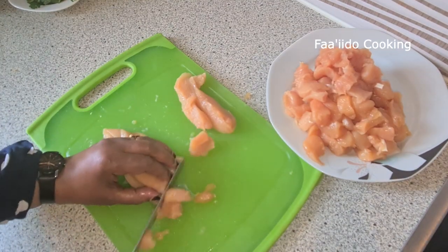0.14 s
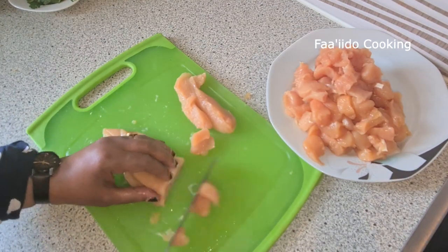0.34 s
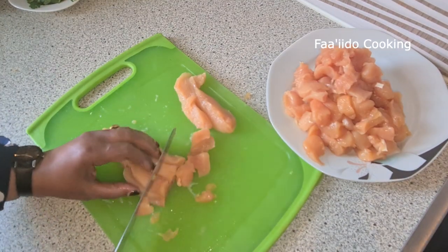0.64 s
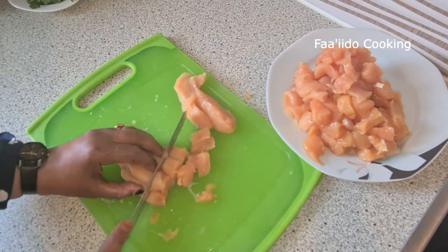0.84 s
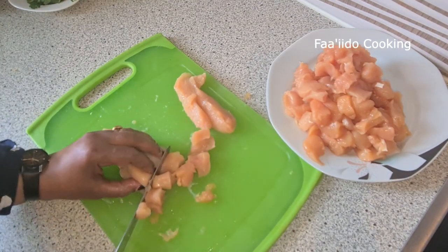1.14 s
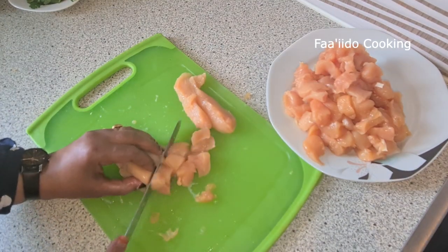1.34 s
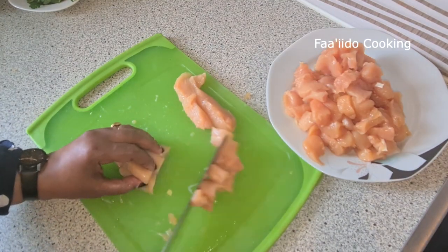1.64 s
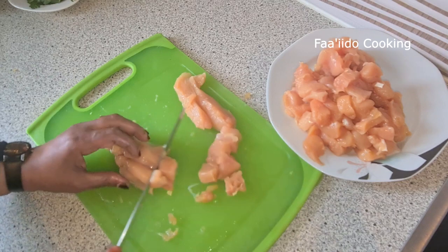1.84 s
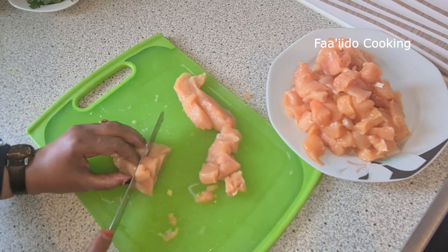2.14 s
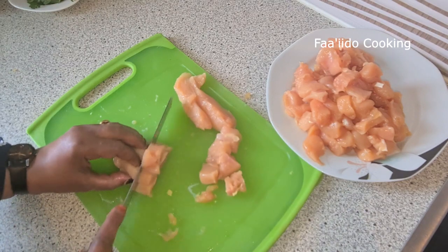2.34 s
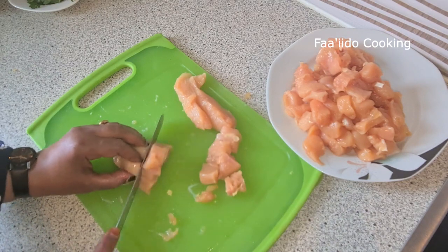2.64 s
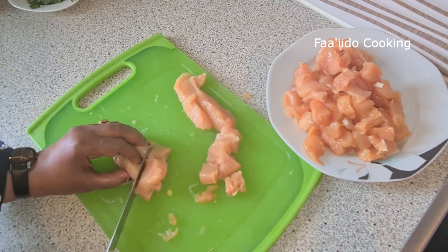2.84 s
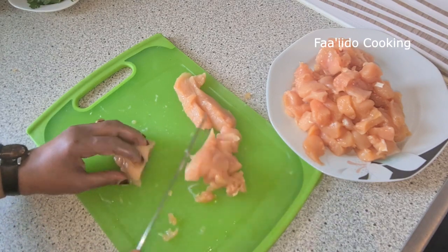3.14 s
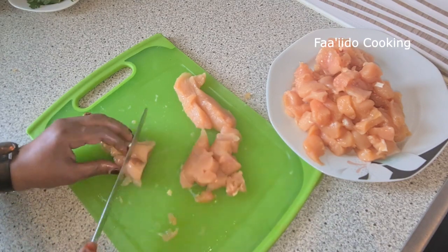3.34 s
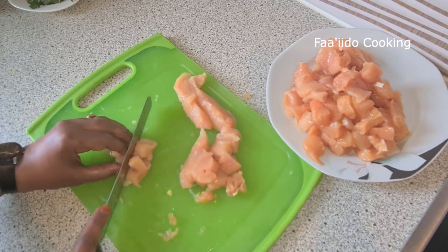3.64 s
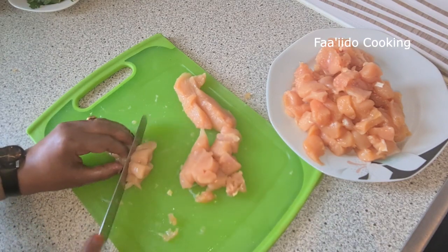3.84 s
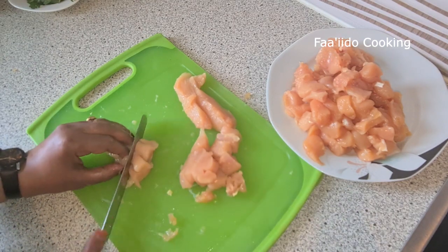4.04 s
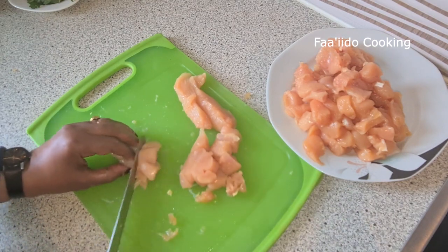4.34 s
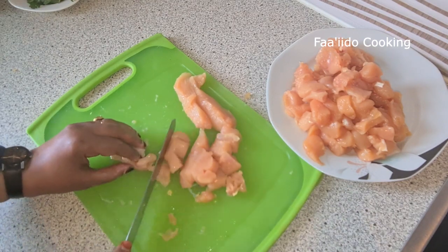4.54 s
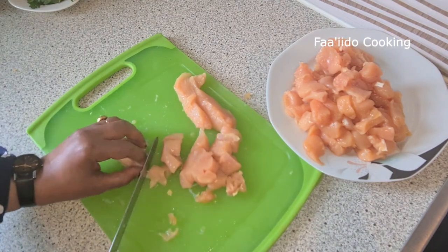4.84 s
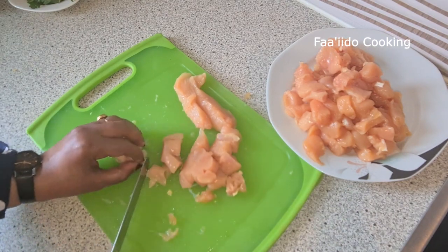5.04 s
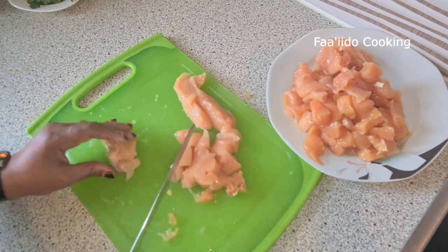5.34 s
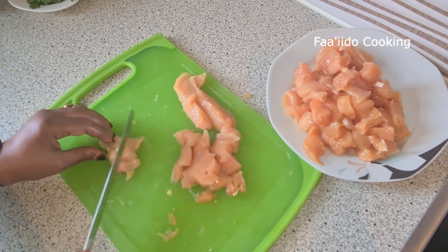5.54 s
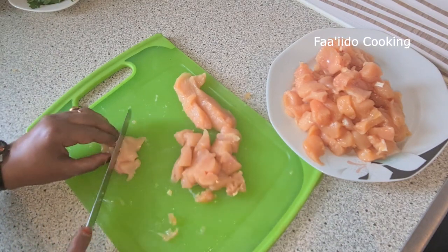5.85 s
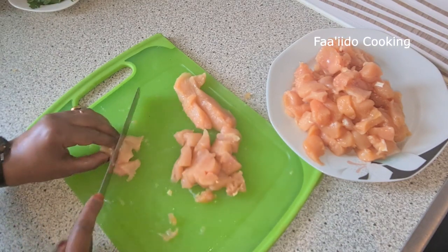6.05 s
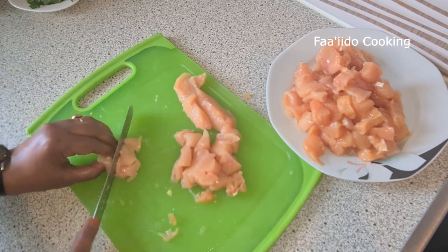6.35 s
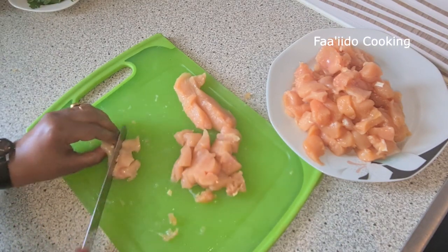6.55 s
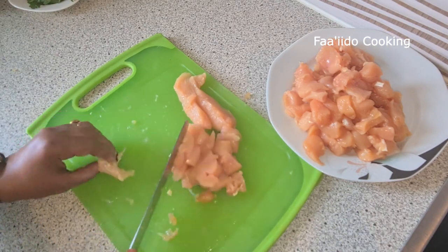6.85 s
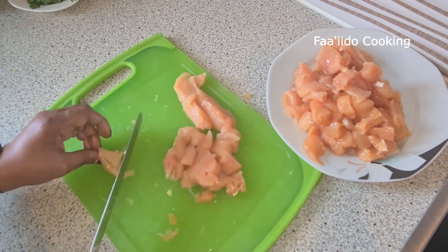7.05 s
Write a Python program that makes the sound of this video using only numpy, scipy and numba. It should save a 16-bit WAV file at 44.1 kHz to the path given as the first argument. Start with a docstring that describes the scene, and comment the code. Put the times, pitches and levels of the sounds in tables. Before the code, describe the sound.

Quiet sticky handling of raw meat alternates with brisk sawing on a resonant plastic board. Each dry, grainy stroke lasts about a tenth of a second, some ending in a short squeak. Quick sideways scrapes swell and glide upward, with soft thumps. Late in the middle the blade knocks the board very loudly once; sweeping and sawing follow. Heard up close in a small room with short reverberation, faint refrigerator hum and low rumble.

```python
"""A small kitchen, a stereo microphone close to a plastic board: a knife cuts raw chicken.
From the start a low room rumble, a faint refrigerator hum and the sticky crackle of the meat lie underneath.
The edge saws to and fro, random slips ringing the board, and squeaks; then it sweeps each piece aside,
a chatter swelling through a hollow ring that glides up, among soft sinking thumps.
Short bursts of noise make the wet ticks and smacks of the meat; now and then the blade knocks on the board."""
import sys
import numpy as np
from scipy import signal
from scipy.fft import rfft, irfft
from scipy.io import wavfile
from scipy.ndimage import uniform_filter1d
from numba import njit

SR = 44100
rng = np.random.default_rng(int(sys.argv[2]) if len(sys.argv) > 2 else 0)


def to_wav(sig):
    """Store sig (one row per channel, or 1-D mono) as 16-bit WAV at the path in sys.argv[1].

    Samples outside -1..1 are clipped; the rate is SR.
    """
    pcm = np.clip(np.atleast_2d(sig), -1, 1) * 32767
    pcm = np.round(pcm).astype(np.int16)
    wavfile.write(sys.argv[1], SR, pcm.T)  # frames by channels


N = 316638  # samples, about 7.2 s
FREQS = np.maximum(np.arange(4097) * SR / 8192, 1)  # frequency axis of all responses [Hz]


def undb(db):
    """Decibels to gain."""
    return 10 ** (np.asarray(db) / 20)


def unit(x):
    """Scale to rms 1."""
    return x / np.sqrt(np.mean(x ** 2))


def colour(points, hz=FREQS):
    """Read (frequency [Hz], value) points on a log-frequency axis."""
    f, v = np.transpose(points)
    return np.interp(np.log(np.maximum(hz, 1)), np.log(f), v)


def bell(hz, width):
    """Power response of one resonance, 1 at its centre."""
    return 1 / (1 + ((FREQS / hz - hz / FREQS) * hz / width) ** 2)


def resonances_power(modes):
    """Power that resonances (centre [Hz], width [Hz], gain [dB]) add to a flat response."""
    return sum((undb(db) ** 2 - 1) * bell(hz, width) for hz, width, db in modes)


def ring(db):
    """Minimum-phase impulse response with the given gain at FREQS: its energy comes early."""
    cepstrum = irfft(np.log(undb(db)))
    half = len(cepstrum) // 2
    # fold the cepstrum on to positive times, which makes the response causal
    cepstrum[1:half] *= 2
    cepstrum[half + 1:] = 0
    return irfft(np.exp(rfft(cepstrum)))[:half]


def add(out, s, x):
    """Mix x into out at time s."""
    i = int(s * SR)
    x, i = x[max(-i, 0):], max(i, 0)
    out[i:i + len(x)] += x[:N - i]


def slips(n, rate, spread_db):
    """Random clicks of unequal size, rms 1; rate is their mean number per second."""
    hit = rng.random(n) < rate / SR
    size_db = spread_db * np.minimum(rng.exponential(size=n), 4)
    return unit(hit * rng.standard_normal(n) * undb(size_db) + 1e-9)


def walk(n, rate):
    """Smooth random curve with rate knots per second, spread near 1."""
    at = np.arange(n) * rate / SR
    knots = int(at[-1]) + 2
    return 1.2 * np.interp(at, np.arange(knots), rng.standard_normal(knots))


def stereo_noise(n, alike_hz):
    """Noise spectra at two close microphones: alike in the bass, unrelated in the treble."""
    hz = np.arange(n // 2 + 1) * SR / n
    mid, side = rfft(rng.standard_normal((2, n)))
    alike = .99 / (1 + (hz / alike_hz) ** 2)
    left_right = np.array([[1], [-1]])
    return hz, (mid * np.sqrt(1 + alike) + left_right * side * np.sqrt(1 - alike)) / np.sqrt(2)


# the plastic board's resonances: (centre [Hz], width [Hz], gain over the smooth response [dB])
BOARD_MODES = [(351, 31, 12.5), (366.5, 28, 15), (620, 16, 1), (694.5, 20, 10), (935, 31, 5),
               (1120, 11, 4.5), (1190, 8.9, 7), (1260, 57, -8), (1356, 65, 7.5), (1460, 85, 3.5),
               (1780, 40, 9), (2037, 38, 8.5), (2475, 40, 4.5), (3050, 160, 1), (3830, 110, 2.5)]


def board_db():
    """The board's resonances as a gain curve."""
    return 10 * np.log10(1 + resonances_power(BOARD_MODES).clip(-.5))


# Source levels below are dry, at the board; only hum and room tone bypass the kitchen's response.
# refrigerator hum: (frequency [Hz], level [dB rms])
FRIDGE_HUM = [(49.4, -77.5), (98.8, -76), (247, -88), (346, -80), (1233, -88.5), (1480, -83)]
# colour of the rumble and hiss of the room: (frequency [Hz], density [dB])
ROOM_COLOUR = [(20, -15.5), (35, -5.5), (60, -0.5), (160, -13), (350, -26.5), (600, -18.5), (1400, -27),
               (4600, -27), (8000, -44.5), (13000, -37.5), (16000, -65)]
ROOM_TONE_DB = -65.5  # rms


def room_tone():
    """Steady low rumble and faint hiss of coloured noise; the refrigerator's sines waver in phase."""
    hz, spectra = stereo_noise(N, alike_hz=700)
    t = np.arange(N) / SR
    hum = 0
    for f, db in FRIDGE_HUM:
        hum = hum + undb(db) * np.sqrt(2) * np.sin(2 * np.pi * f * t + .5 * walk(N, 4.2))
    rumble = unit(irfft(spectra * undb(colour(ROOM_COLOUR, hz)), N))
    return hum + undb(ROOM_TONE_DB) * rumble


def fibres(speed, rate=260, low_hz=900, high_hz=6000, cycles=5, spread_db=3.3):
    """Fibres part under the edge: short pings, each at its own pitch, stronger where the edge is fast."""
    out, t = np.zeros(len(speed)), np.arange(SR // 60) / SR
    chance = rng.random((80, 3))
    for when, pitch, size in chance[:int(rate * len(speed) / SR) + 1]:
        hz, i = low_hz * (high_hz / low_hz) ** pitch, int(when * len(speed))
        ping = np.sin(2 * np.pi * hz * t) * np.exp(-np.pi * hz * t / cycles)
        ping = ping * undb(-spread_db * np.log(size + .02))
        out[i:i + len(t)] += speed[i] * ping[:len(out) - i]
    return unit(signal.lfilter(*signal.butter(2, 800, "high", fs=SR), out) + 1e-12)


def patch_db(spread_db, count=28):
    """Chance colouring of one spot on the board; the bass and the top stay as they are."""
    gains_db = np.pad(spread_db * rng.standard_normal(count - 2), 1)
    return colour(np.c_[np.geomspace(450, 8000, count), gains_db])


LEAD_S = .035  # a faint rasp fades in for this long before a stroke
# uneven sawing: flutter of the grip, colour shifts along the stroke, fibre pings before the rasp's share
GRIP_DB, PATCH_DB, FIBRE_DB = 2.2, 3.2, -9.5


def stroke(length, crest, body_db, rasp_db, hiss_db, response_db, rate, grip_db, swell, lead_db=-22, count=6):
    """A faint rasp fades in, then the edge sticks and slips over the board; treble gathers with its speed."""
    t = np.arange(-int(LEAD_S * SR), int(length * SR)) / SR
    n = len(t)
    travel = np.interp(t / length, [0, np.clip(crest, .05, .95), 1], [0, .5, 1])
    faint = undb(lead_db) * np.interp(t, [-LEAD_S, 0, length], [0, 1, 0])
    speed = np.sin(np.pi * travel).clip(1e-6)
    force = slips(n, rate, spread_db=0.5)
    force = force * undb(grip_db * walk(n, 168.7)) * np.hypot(speed ** swell, faint)
    dull = signal.lfilter(*signal.butter(2, 1900, fs=SR), force)
    force = dull + np.sqrt(speed) * (force - dull)
    tone = [(750, body_db), (1000, 0.0045), (1550, 0.0), (2100, rasp_db), (5000, rasp_db), (8000, hiss_db)]
    db = response_db + colour(tone)
    # the contact point travels, so each part of the stroke favours other frequencies
    sound = 0
    for place in range(count):
        near = np.maximum(1 - np.abs((count - 1) * travel - place), 0)
        sound = sound + signal.fftconvolve(force * near, ring(db + patch_db(PATCH_DB)))
    sound = sound / np.sqrt(np.sum(sound ** 2) / (length * SR))
    sound[:n] += undb(FIBRE_DB + rasp_db / 2) * fibres(speed)
    return sound


# sawing strokes: (start [s], length [s], crest [share of the length], level [dB], board body [dB],
# rasp [dB], wet hiss [dB], favoured board resonance [Hz])
SAW_STROKES = [(0.0, 0.025, 0.057, -39.5, -1, 5.5, 6, 1260.0), (0.087, 0.14, 0.16, -35, 2.5, 2, 1, 930),
               (1.06, 0.088, 0.11, -37, 4.5, 2, 3.5, 1480), (1.197, 0.13, 0.28, -39, 5, 2, 3.5, 1460),
               (1.35, 0.115, 0.52, -34.5, 4, -1, -2, 750), (2.409, 0.1, 0.32, -38, 1.5, 2, -1.5, 1200),
               (2.563, 0.13, 0.76, -42, 2.5, 4.5, 0.5, 1210), (2.72, 0.16, 0.21, -39, -4.5, -2, -5.5, 1390),
               (3.638, 0.1, 0.24, -57, 15, -0.5, 3, 1370), (3.802, 0.13, 0.39, -33.5, -2.5, -4, -5, 1350),
               (3.995, 0.11, 0.84, -37.5, 1, -4.5, -4.5, 3050), (4.168, 0.14, 0.3, -36, 3, -7, -7.5, 1390),
               (4.83, 0.16, 0.75, -39, -1.5, -3.5, -4.5, 1310),
               (5.912, 0.073, 0.3, -59.5, 13, -2.5, 14, 1380.0),
               (6.153, 0.11, 0.99, -56, 14.5, -3, 1, 1460.0),
               (6.288, 0.14, 0.44, -37, -4.5, 0.5, -0.5, 1290),
               (6.479, 0.15, 0.35, -32, -5, -2.5, -3, 1260)]
# smooth response of board and blade to sawing: (frequency [Hz], density [dB])
SAW_COLOUR = [(100, -22), (210, -28), (330, -20.5), (480, -26), (750, -20), (1080, -4.5), (1420, -4.5),
              (1650, -15), (2050, -6.5), (2600, -5.5), (3200, -6.5), (5000, -15.5), (7500, -28.5),
              (12000, -25), (15500, -38.5)]


def slicing(favour_db=4):
    """Lengthwise sawing: dense fine slips into the board."""
    out, response_db = np.zeros(N), colour(SAW_COLOUR) + board_db()
    for s, length, crest, db, body_db, rasp_db, hiss_db, hz in SAW_STROKES:
        spot_db = response_db + favour_db * bell(hz, 220)
        sound = stroke(length, crest, body_db, rasp_db, hiss_db, spot_db, rate=1900, grip_db=GRIP_DB, swell=0.44)
        add(out, s - LEAD_S, undb(db) * sound)
    return out


# the fingers press the meat into place: (start [s], length [s], level [dB])
FINGER_PRESSES = [(0.774, 0.21, -60.5), (0.958, 0.22, -55.5), (2.139, 0.18, -59.5), (2.351, 0.14, -56.5),
                  (3.601, 0.11, -60), (6.114, 0.1, -62.5)]
# crackle under the resting hand, and from a piece just swept aside, which settles
HOLD_DB, SETTLE_DB, SETTLE_S = -72, -57.5, 0.12


def stickiness():
    """Strength of rub and crackle: it swells under each press of the fingers and dies away after each sweep."""
    t = np.arange(N) / SR
    power = np.full(N, undb(HOLD_DB) ** 2)
    for s, length, db in FINGER_PRESSES:
        power += (undb(db) * np.sin(np.pi * np.clip((t - s) / length, 0, 1))) ** 2
    for s, hold, *_ in SIDE_SWEEPS:
        since = t - s - hold
        power += (since > 0) * (undb(SETTLE_DB) * np.exp(-np.abs(since) / SETTLE_S)) ** 2
    return np.sqrt(power)


# faint smacks come by chance, at any pitch in this range
STRAY_DB, STRAY_SPREAD_DB, STRAY_LOW_HZ, STRAY_HIGH_HZ = -50, 2.5, 2970, 10000


def stray_smacks(count, width_hz=3300, length_s=0.0019):
    """Faint smacks at random moments, as rows (time [s], peak [dB], pitch [Hz], width [Hz], length [s])."""
    rows = []
    for when, size, pitch in rng.random((count, 3)):
        db = STRAY_DB + STRAY_SPREAD_DB * (2 * size - 1)
        hz = STRAY_LOW_HZ * (STRAY_HIGH_HZ / STRAY_LOW_HZ) ** pitch
        rows.append((when * N / SR, db, hz, width_hz, length_s))
    return rows


# the loudest wet smacks: (time [s], peak [dB], pitch [Hz], width [Hz], decay of the burst [s])
WET_SMACKS = [(0.705, -35.5, 6700, 4200, 0.0057), (.73, -39, 1500, 900, 0.0018),
              (0.731, -33.5, 4140, 2500, 0.0036), (0.814, -35.5, 1690, 990, 0.0012),
              (0.899, -38, 1770, 1100, 0.0022), (0.989, -36.5, 12700, 6000, .0016),
              (0.994, -41, 1700, 1400, .0016), (1.116, -34, 13000, 5000, .002),
              (1.804, -36.5, 9800, 2830, 0.0013), (1.856, -42.5, 1400, 1800, 0.001),
              (1.954, -41.5, 4130, 1690, 0.0015), (2.034, -40.5, 4400, 3480, 0.0022),
              (2.048, -43.5, 1400, 1000, 0.003), (2.049, -50, 4280, 3000, .003),
              (3.081, -37.5, 7400, 4500, 0.0018), (3.491, -40, 5500, 6000, 0.0023),
              (3.526, -33.5, 4540, 5000, 0.0036), (3.597, -38.5, 9250, 4500, .0006),
              (5.24, -39, 12000, 7100, 0.0018), (5.327, -28, 10700, 6100, 0.0016),
              (5.712, -42.5, 7400, 3000, 0.002), (5.713, -49.5, 1400, 995, 0.0015),
              (6.031, -47.5, 9000, 3000, 0.0017), (6.099, -47, 12400, 5000, .0016),
              (6.21, -38.5, 4940, 4900, 0.0024), (6.784, -39, 7250, 4400, .0016)]
# the fingers rubbing on the meat: (frequency [Hz], density [dB])
RUB_COLOUR = [(100, -2.5), (340, 8.5), (600, -2.5), (1500, 3.5), (2800, -5.5), (5000, -10), (11000, -21),
              (15500, -28)]
# the sticky crackle of its wet film: (frequency [Hz], density [dB])
FILM_COLOUR = [(1000, -33), (3000, -11.5), (6000, -3), (11000, 4), (15500, -8.5)]


def meat(crackle_db=-12, click_db=-34, film_db=-9):
    """Wet films snap in tiny bursts; handling adds a soft rub and a fine sticky crackle."""
    out, t = np.zeros(N), np.arange(SR // 30) / SR
    for s, db, hz, width_hz, smack_s in WET_SMACKS + stray_smacks(count=8):
        burst = (t == 0) + undb(crackle_db) * slips(len(t), 3200, spread_db=7.0) * np.exp(-t / smack_s)
        snap = signal.fftconvolve(burst, ring(20 * np.log10(bell(hz, width_hz) + undb(click_db))))
        add(out, s, undb(db) * snap / np.abs(snap).max())
    rub = unit(signal.fftconvolve(slips(N, 1800, spread_db=1.3), ring(colour(RUB_COLOUR)))[:N])
    crackle = unit(signal.fftconvolve(slips(N, 600, spread_db=5), ring(colour(FILM_COLOUR)))[:N])
    handling = rub * undb(0.57 * walk(N, 19)) + undb(film_db) * crackle
    return out + handling * stickiness()


# the edge catches and squeaks on the board: (start [s], length [s], level [dB rms], pitch [Hz])
EDGE_SQUEAKS = [(.003, 0.023, -41, 1233), (0.076, 0.019, -43.5, 1330), (0.653, 0.13, -62.5, 1391),
                (1.225, 0.047, -49, 1422), (2.188, 0.076, -65, 1396), (2.589, 0.058, -47.5, 1370),
                (2.73, 0.034, -46, 1288), (2.81, 0.048, -44, 1325), (3.64, 0.079, -50.5, 1374),
                (3.858, 0.037, -32.5, 1406), (3.994, 0.018, -47, 1356), (4.029, 0.0081, -47, 1340),
                (4.051, 0.019, -31.5, 1402), (4.894, 0.017, -35, 1394), (5.055, 0.11, -41.5, 1378),
                (5.936, 0.035, -60.5, 1394), (6.1, 0.052, -60.5, 1386), (6.164, 0.069, -49.5, 1414),
                (6.56, 0.027, -32, 1418), (6.679, 0.019, -32, 1339), (6.704, 0.02, -36, 1380)]


def squeaking(waver=.06, flutter_db=4, overtone=2.2, overtone_db=-15):
    """Stick and slip lock on to the board's main resonance: a rough, unsteady tone with a thin overtone."""
    out = np.zeros(N)
    for s, length, db, hz in EDGE_SQUEAKS:
        n = int(length * SR)
        phase = 2 * np.pi * np.cumsum(hz * (1 + waver * walk(n, 605))) / SR
        grip = np.sqrt(np.sin(np.pi * np.arange(n) / n)) * undb(flutter_db * walk(n, 304))
        tone = np.sin(phase) + undb(overtone_db) * np.sin(overtone * phase)
        add(out, s, undb(db) * unit(grip * tone))
    return out


@njit
def moving_band(x, hz, damping):
    """Band-pass whose centre moves every sample, gain 1 at the centre."""
    y, band, low = np.empty(len(x)), 0., 0.
    for i in range(len(x)):
        g = np.tan(np.pi * hz[i] / SR)
        v = (band + g * (x[i] - low)) / (1 + g * (g + damping))
        band, low, y[i] = 2 * v - band, low + 2 * g * v, damping * v
    return y


# sideways sweeps: (crest [s], hold [s], level [dB], hollow pitch at the crest [Hz], hollow ring [dB],
# low boom [dB], rasp [dB], wet hiss [dB])
SIDE_SWEEPS = [(0.316, 0.0067, -18, 790, 13, -16, 7, 5.5), (1.56, 0.021, -29, 630, -19, -12.5, -2, -2.5),
               (2.947, 0.0096, -32.5, 700, -12, -2, -4.5, -12),
               (5.108, 0.037, -18.5, 806, -2.5, -7.5, 2, -3),
               (6.697, 0.022, -31, 1140, -8.5, -7.5, 0.5, -1)]
# smooth response of board and blade to a sweep: (frequency [Hz], density [dB])
SIDE_COLOUR = [(100, -28), (200, -30), (300, -1), (450, -19), (600, -9.5), (800, -10), (1120, 0.5),
               (1400, -1), (1650, -7.5), (2300, -3.5), (3500, -5.5), (5500, -13), (8000, -26), (12000, -14),
               (15500, -28)]
# swell and release (s per 20 dB); the hollow ring rises as the blade moves on
SWEEP_RISE_S, SWEEP_FALL_S, HOLLOW_OCTAVES_PER_S = .023, .021, 20


def sweeping(damping=0.58, brighten_s=0.052, board_share=1.0, grip_db=-3.0):
    """The blade is flicked sideways: chatter swells to a crest, dull at first, through a rising hollow ring."""
    out = np.zeros(N)
    t = np.arange(-SR // 14, SR // 10) / SR
    for s, hold, db, hz, hollow_db, boom_db, rasp_db, hiss_db in SIDE_SWEEPS:
        push = 10 ** (np.minimum(t / SWEEP_RISE_S, 0) + np.minimum((hold - t) / SWEEP_FALL_S, 0))
        force = slips(len(t), 4000, spread_db=3.0) * push * undb(grip_db * walk(len(t), 200))
        dull = signal.lfilter(*signal.butter(1, 1300, fs=SR), force)
        force = dull + (force - dull) / (1 + np.exp(-t / brighten_s))
        hollow_hz = hz * 2 ** np.clip(HOLLOW_OCTAVES_PER_S * t, -.5, 1)
        force = force + undb(hollow_db) * moving_band(force, hollow_hz, float(damping))
        tone = [(400, boom_db), (560, 0.0087), (1550, 0.015), (2100, rasp_db), (5000, rasp_db), (8000, hiss_db)]
        response_db = colour(SIDE_COLOUR) + board_share * board_db() + colour(tone)
        sound = signal.fftconvolve(force, ring(response_db))
        # the whole sweep carries the energy of its push
        sound = sound * np.sqrt(np.sum(push ** 2) / np.sum(sound ** 2))
        add(out, s + t[0], undb(db) * sound)
    return out


# thumps cushioned by the meat, and the board rocking on the counter after a heavy cut:
# (crest [s], peak [dB], pitch at the crest [Hz], length [s])
SOFT_THUMPS = [(.305, -36, 340, 0.013), (0.32, -28, 620, 0.016), (0.33, -42, 290, 0.011),
               (.867, -53, 290, .02), (1.071, -35, 320, 0.01), (1.401, -37.5, 325, 0.019),
               (1.539, -43.5, 340, 0.019), (1.566, -32.5, 600, 0.025), (2.272, -53, 300, .025),
               (2.425, -35, 310, 0.0083), (2.956, -53, 290, 0.012), (4.082, -26, 147.3, 0.014),
               (4.084, -27, 427, 0.006), (4.082, -19.5, 790, 0.0087), (4.126, -30.5, 70.2, 0.019),
               (4.144, -35, 65, .016), (4.183, -43, 60, .02), (4.207, -40, 80, 0.012),
               (6.213, -47.5, 300, .014), (6.706, -41.5, 320, 0.016)]


def thumping(sag_octaves_per_s=5, fall_share=1.2):
    """Soft pushes: a few cycles that swell without a click and sag a little in pitch."""
    out, t = np.zeros(N), np.arange(-SR // 20, SR // 12) / SR
    for s, db, hz, length in SOFT_THUMPS:
        swell = np.exp(-(2 * t / (length * np.where(t < 0, 1, fall_share))) ** 2)
        phase = 2 * np.pi * np.cumsum(hz * 2 ** (-sag_octaves_per_s * t)) / SR
        add(out, s + t[0], undb(db) * swell * np.sin(phase))
    return out


# blade blows on the board: (time [s], peak [dB], contact cut-off [Hz], counter thud against the blow [dB])
BLADE_BLOWS = [(1.403, -29, 1300, -30), (4.0785, -22, 1000, 2), (4.6864, -1.5, 2740, -37),
               (5.535, -49, 2000, -19.5), (5.938, -47, 2500, -16), (6.2115, -31, 3500, -24),
               (6.531, -23, 2800, -33)]
# smooth response of the board to a blow: (frequency [Hz], density [dB])
BLOW_COLOUR = [(80, -31.5), (260, -22), (700, -20), (1150, 0.5), (1400, -9.5), (1800, -14.5), (3800, -14.5),
               (6000, -35.5), (15000, -51.5)]
# smooth response of the counter under it: (frequency [Hz], density [dB])
COUNTER_COLOUR = [(25, -46.5), (55, -17), (115, -4.5), (200, -4), (420, -20.5), (760, -1.5), (1100, -25),
                  (2000, -36.5), (6000, -86)]
# the counter's modes: (centre [Hz], width [Hz], power added to the smooth response [dB])
COUNTER_MODES = [(70.1, 13, 0), (122, 48, 6), (170, 24, 3.5)]


def knocking(ring_share=0.94):
    """Blows on the board, dulled by the meat in between; each also thuds into the counter, faintly or hard."""
    modes_power = sum(undb(db) ** 2 * bell(hz, width) for hz, width, db in COUNTER_MODES)
    thud = ring(colour(COUNTER_COLOUR) + 10 * np.log10(1 + modes_power))
    thud = thud / np.abs(thud).max()
    out = np.zeros(N)
    for s, db, contact_hz, thud_db in BLADE_BLOWS:
        softness_db = 10 * np.log10(1 + (FREQS / contact_hz) ** 4)
        blow = ring(colour(BLOW_COLOUR) + ring_share * board_db() - softness_db)
        add(out, s, undb(db) * (blow / np.abs(blow).max() + undb(thud_db) * thud))
    return out


# the kitchen's decay: (frequency [Hz], time to fall 60 dB [s])
KITCHEN_T60 = [(120, 0.3), (250, 0.2), (500, 0.22), (1000, 0.225), (2000, 0.285), (4000, 0.33),
               (12000, 0.32)]


def kitchen_tail(build_s=0.0011):
    """Diffuse reverberation of unit energy: noise that decays octave by octave."""
    t = np.arange(SR // 2) / SR
    hz, spectra = stereo_noise(len(t), alike_hz=746)
    octave = np.log2(np.clip(hz / 125, 1, 128))
    tail = 0
    for k in range(8):
        band = irfft(spectra * np.maximum(1 - np.abs(octave - k), 0), len(t))
        tail = tail + band * np.exp(-np.log(1000) * t / colour(KITCHEN_T60, 125 * 2 ** k))
    tail = tail * (1 - np.exp(-t / build_s))
    return unit(tail) / np.sqrt(len(t))


def evened(tail):
    """Level a tail's spectrum, so that no room resonance outrings the board."""
    power = np.mean(np.abs(rfft(tail, 2 * len(FREQS) - 2)) ** 2, axis=0)
    response = ring(-10 * np.log10(uniform_filter1d(power, size=11)))
    return signal.fftconvolve(tail, response[None], axes=1)


# early echoes from counter and walls: (delay left [s], delay right [s], level against the direct sound [dB])
EARLY_ECHOES = [(.0021, 0.0015, -8.5), (.0038, 0.0027, -9.5), (0.0146, 0.012, -11)]


def kitchen(x, tail, direct_db, wet_db, right_db):
    """Direct sound, reaching the left microphone first, then early echoes and the tail."""
    response = undb(wet_db) * tail
    response[0, 0] += undb(direct_db)
    response[1, 6] += undb(direct_db + right_db)  # 6 samples later
    for left_s, right_s, db in EARLY_ECHOES:
        response[0, int(left_s * SR)] += undb(direct_db + db)
        response[1, int(right_s * SR)] += undb(direct_db + db)
    return signal.fftconvolve(x[None], response, axes=1)[:, :N]


def scene():
    """Knife, board and meat sound into the same kitchen."""
    tail = evened(kitchen_tail())
    strokes = kitchen(slicing(), tail, direct_db=-6.3, wet_db=-5, right_db=0.6)
    squeaks = kitchen(squeaking(), tail, direct_db=-4.5, wet_db=-13, right_db=0)
    sweeps = kitchen(sweeping(), tail, direct_db=-4.8, wet_db=-7, right_db=0.3)
    knocks = kitchen(knocking(), tail, direct_db=-3.0, wet_db=-1.5, right_db=1.6)
    thumps = kitchen(thumping(), tail, direct_db=-3.5, wet_db=-11.5, right_db=0.0)
    smacks = kitchen(meat(), tail, direct_db=-2, wet_db=-6, right_db=-2)
    return strokes + squeaks + sweeps + knocks + thumps + smacks + room_tone()


TOP_HZ = 15750


def record(dry):
    """The recorder cuts the top with a steep low-pass."""
    return signal.sosfilt(signal.ellip(10, .2, 70, TOP_HZ, fs=SR, output="sos"), dry)


dry = scene()
out = record(dry)
to_wav(out)
```